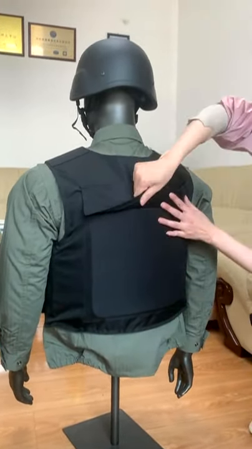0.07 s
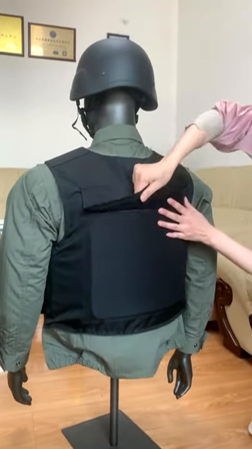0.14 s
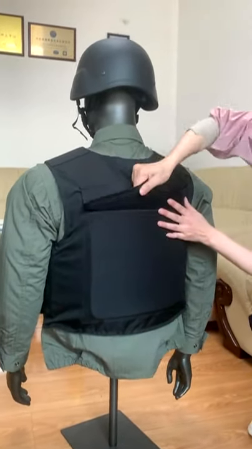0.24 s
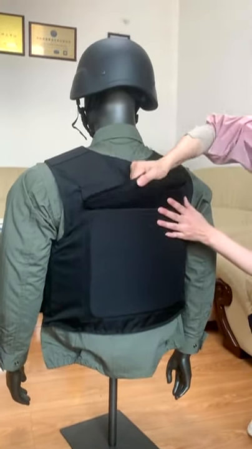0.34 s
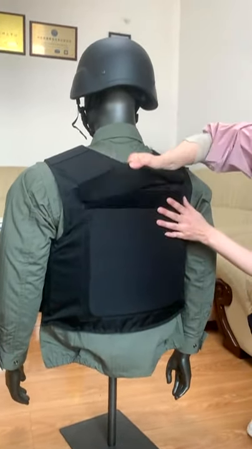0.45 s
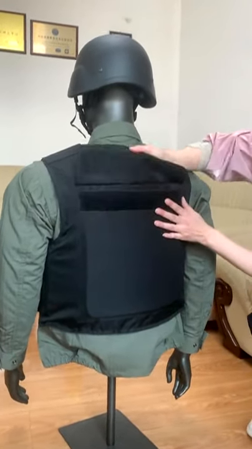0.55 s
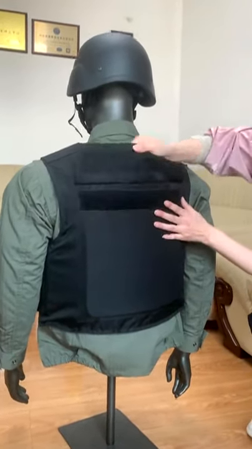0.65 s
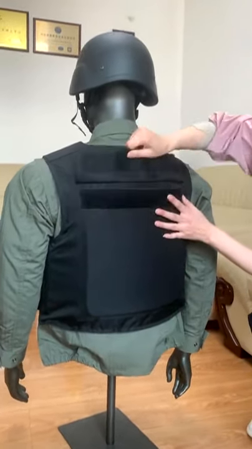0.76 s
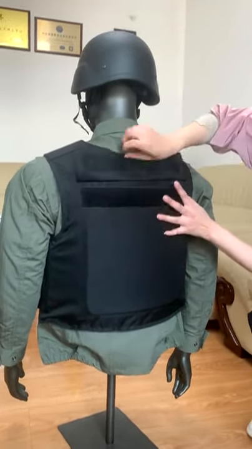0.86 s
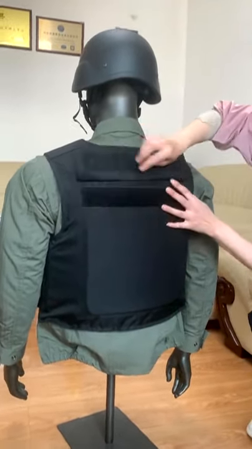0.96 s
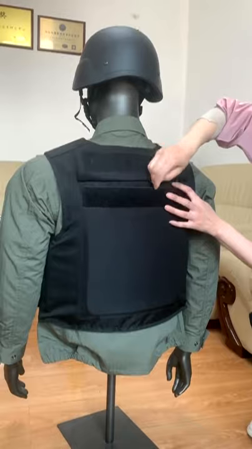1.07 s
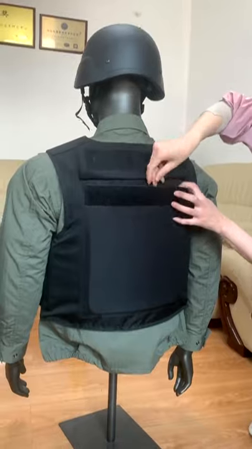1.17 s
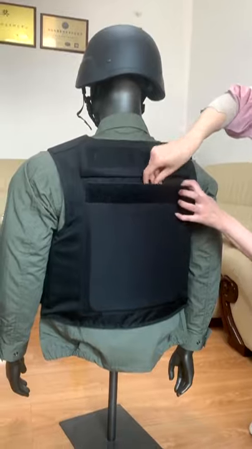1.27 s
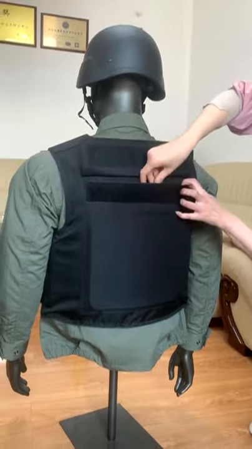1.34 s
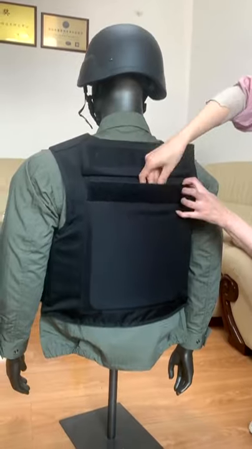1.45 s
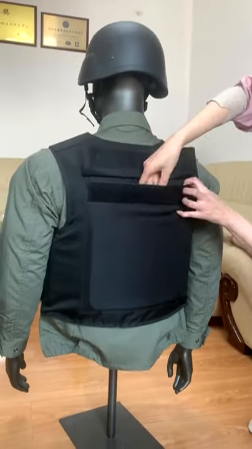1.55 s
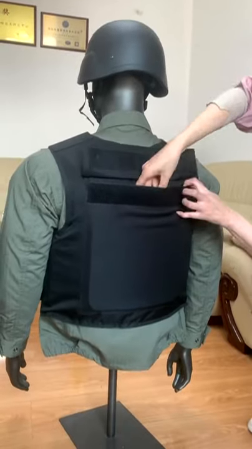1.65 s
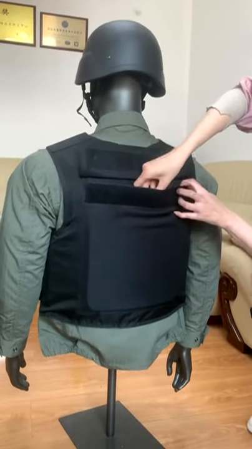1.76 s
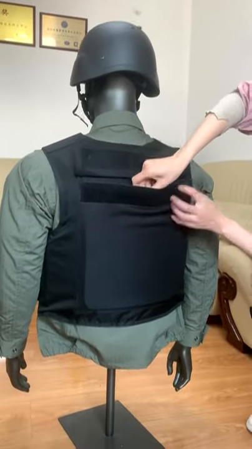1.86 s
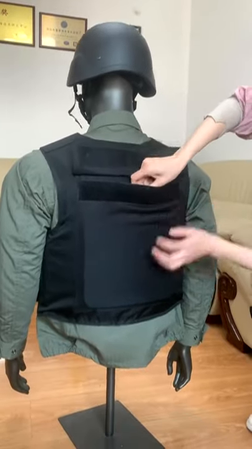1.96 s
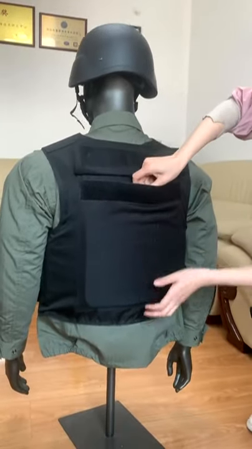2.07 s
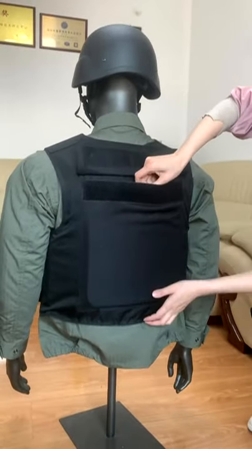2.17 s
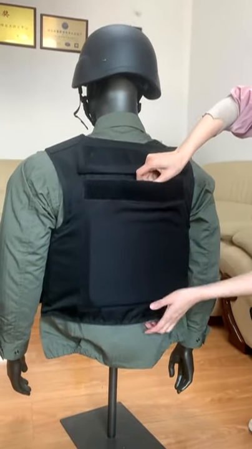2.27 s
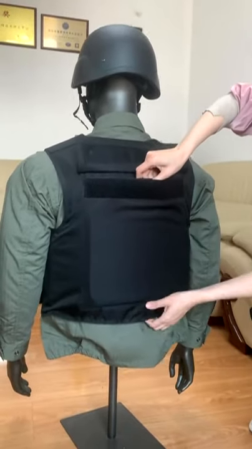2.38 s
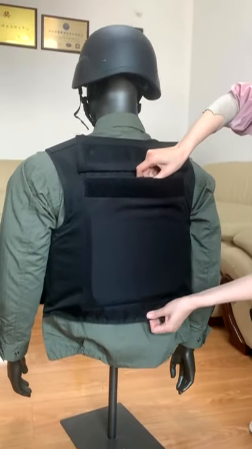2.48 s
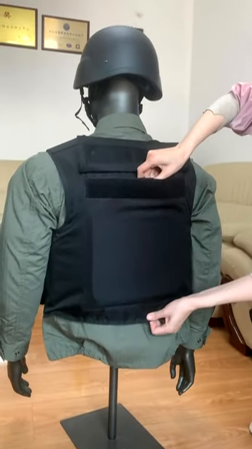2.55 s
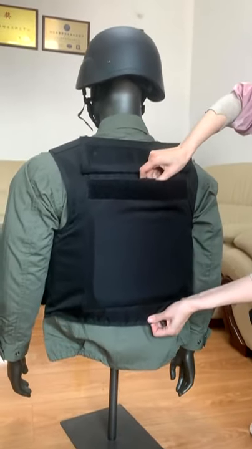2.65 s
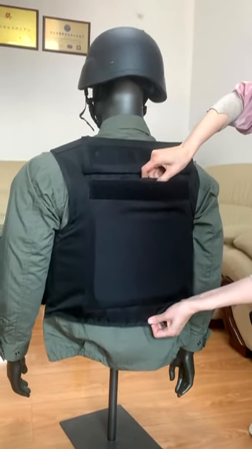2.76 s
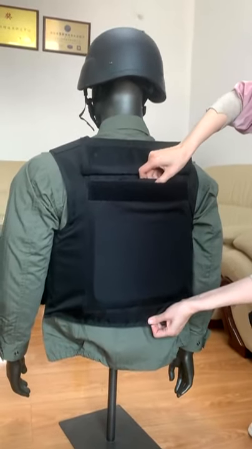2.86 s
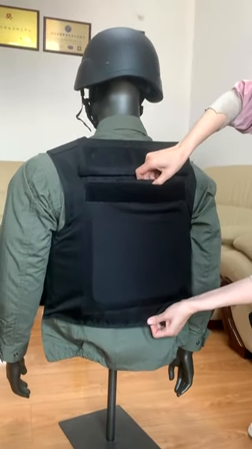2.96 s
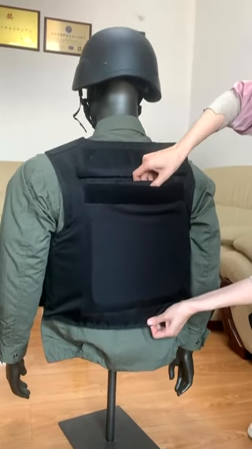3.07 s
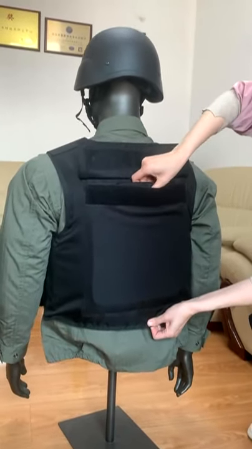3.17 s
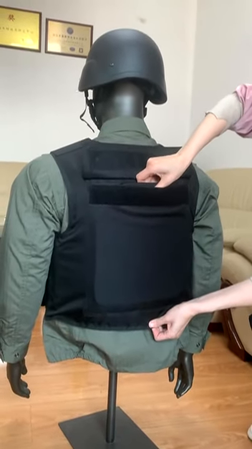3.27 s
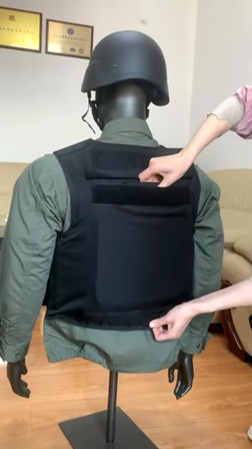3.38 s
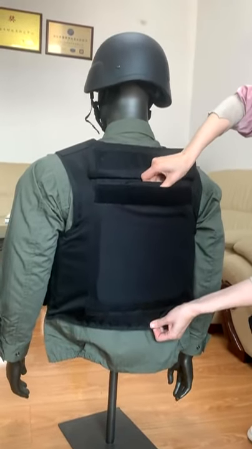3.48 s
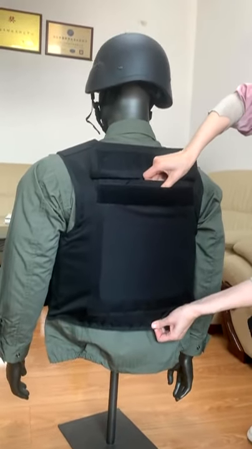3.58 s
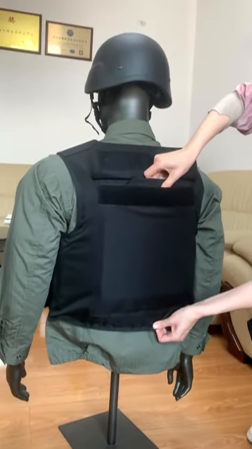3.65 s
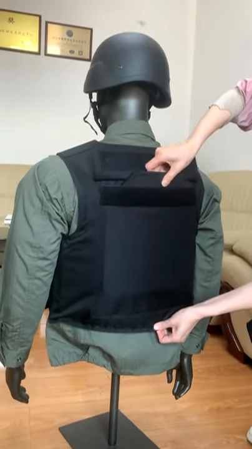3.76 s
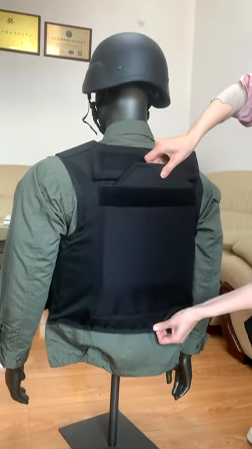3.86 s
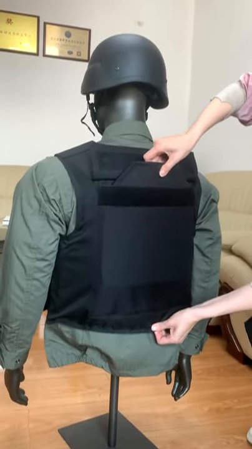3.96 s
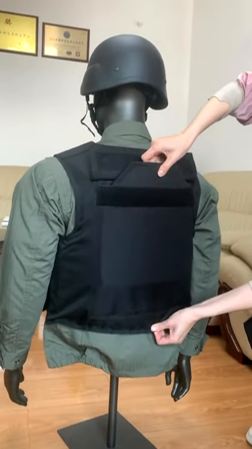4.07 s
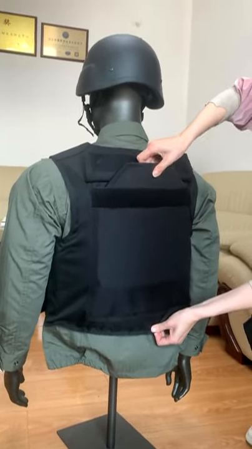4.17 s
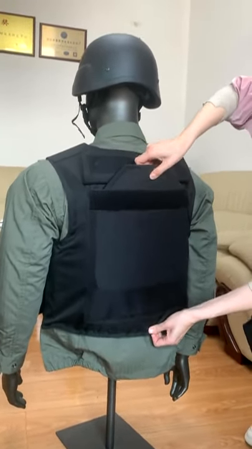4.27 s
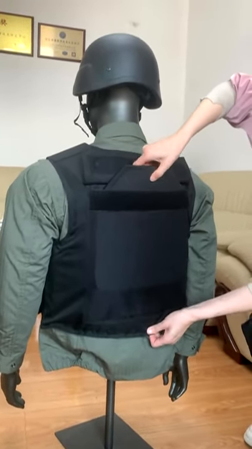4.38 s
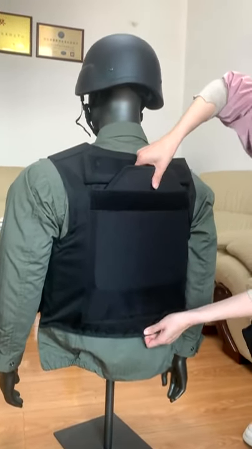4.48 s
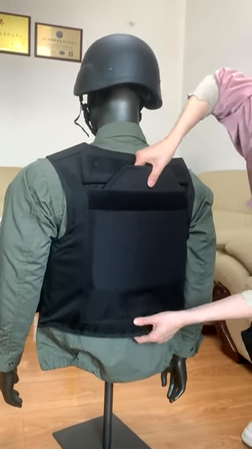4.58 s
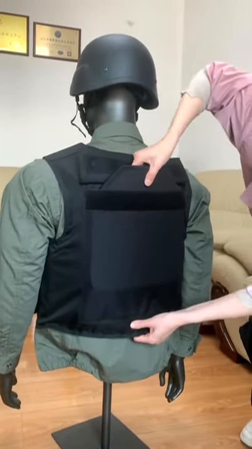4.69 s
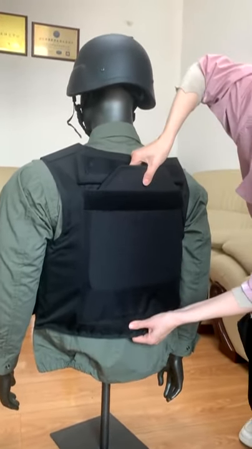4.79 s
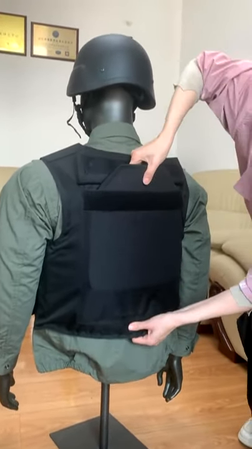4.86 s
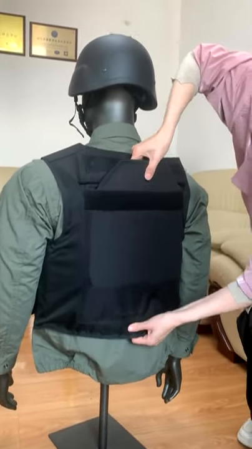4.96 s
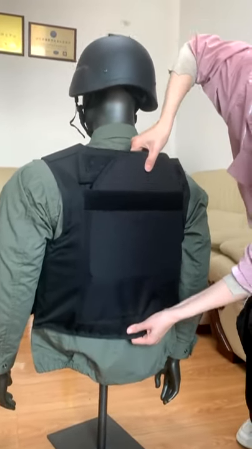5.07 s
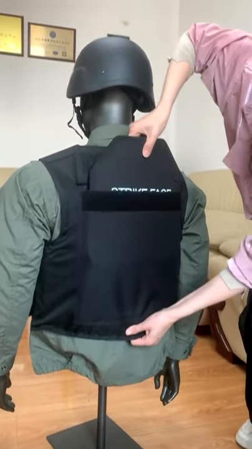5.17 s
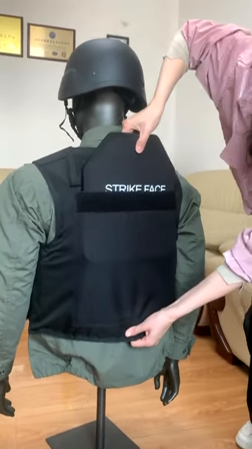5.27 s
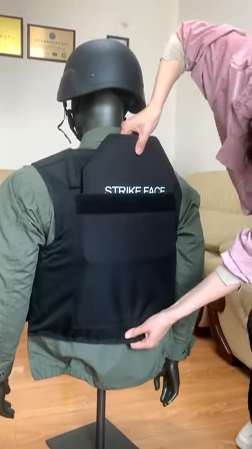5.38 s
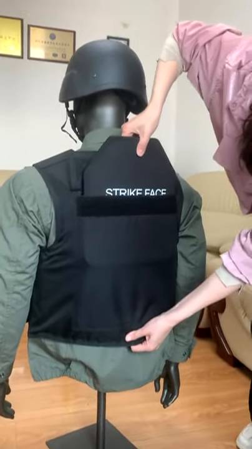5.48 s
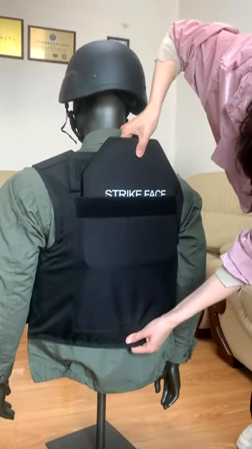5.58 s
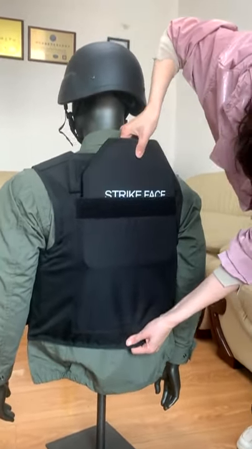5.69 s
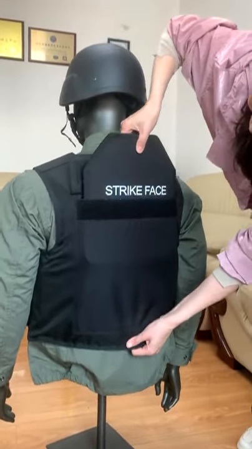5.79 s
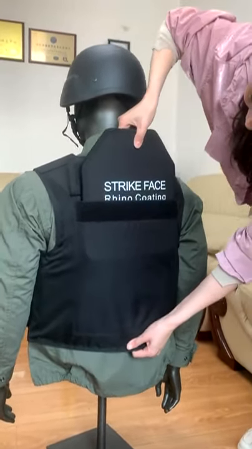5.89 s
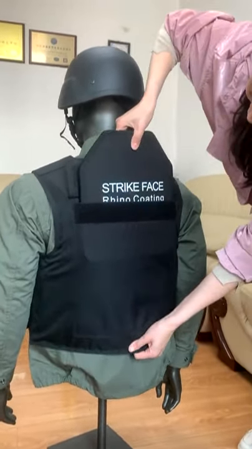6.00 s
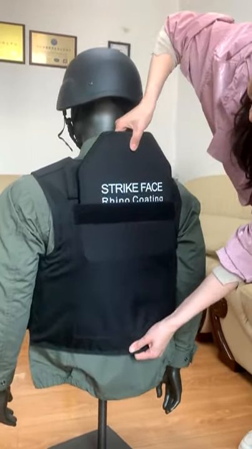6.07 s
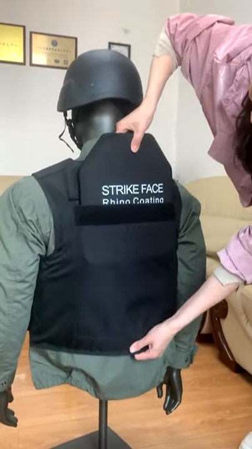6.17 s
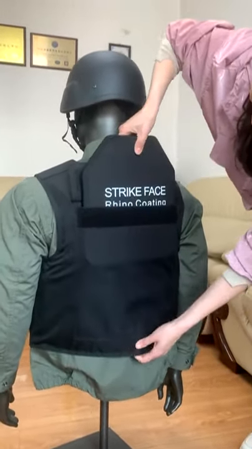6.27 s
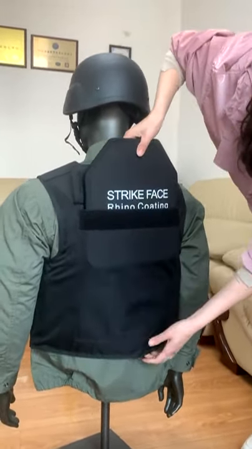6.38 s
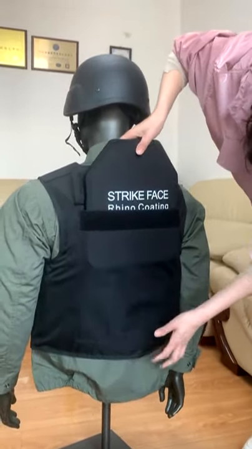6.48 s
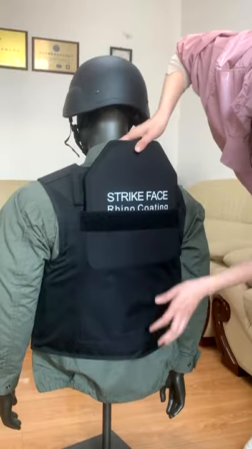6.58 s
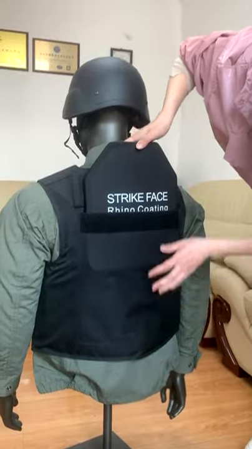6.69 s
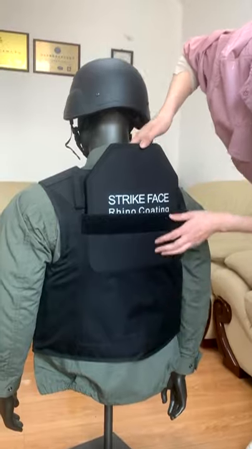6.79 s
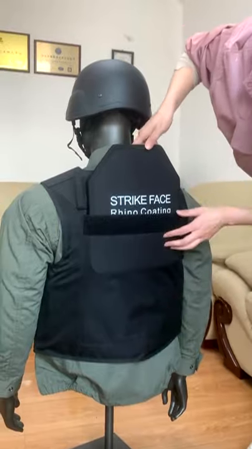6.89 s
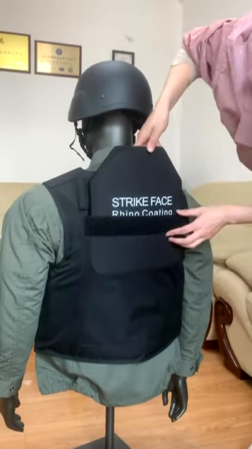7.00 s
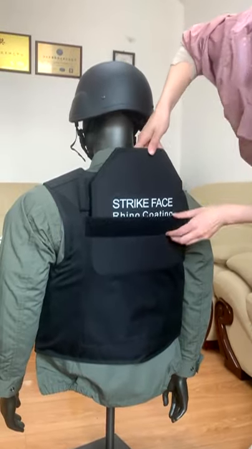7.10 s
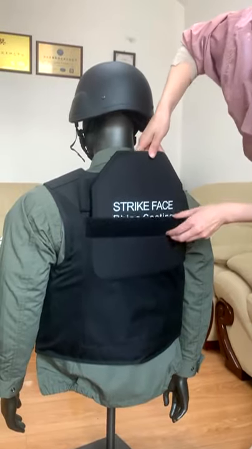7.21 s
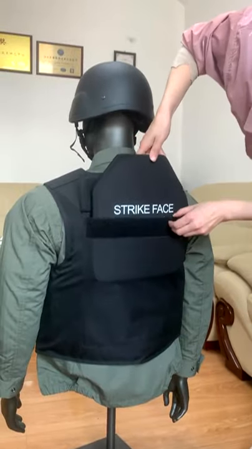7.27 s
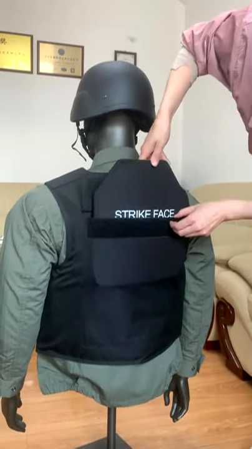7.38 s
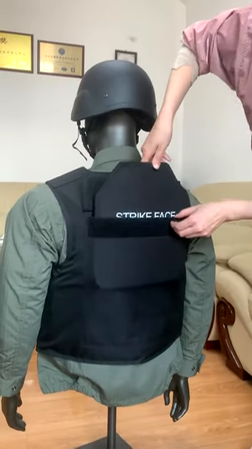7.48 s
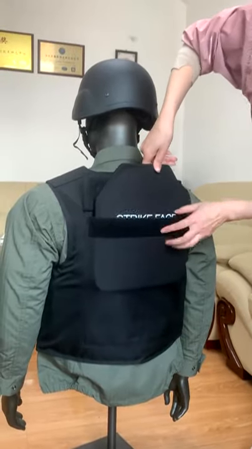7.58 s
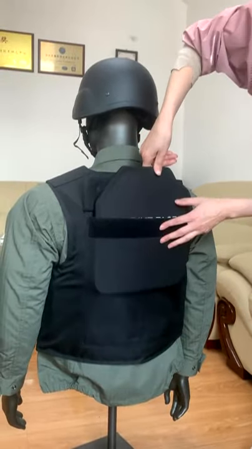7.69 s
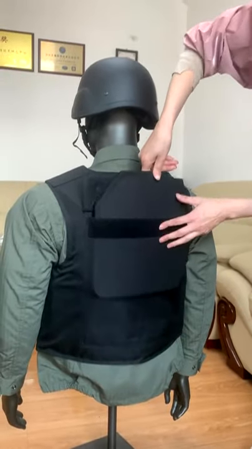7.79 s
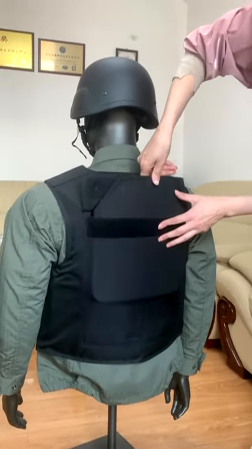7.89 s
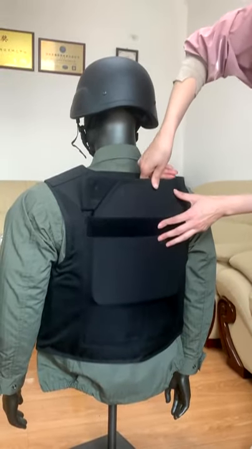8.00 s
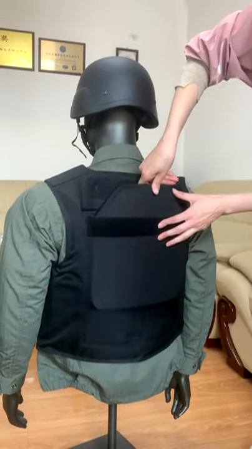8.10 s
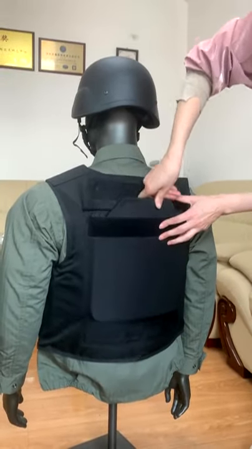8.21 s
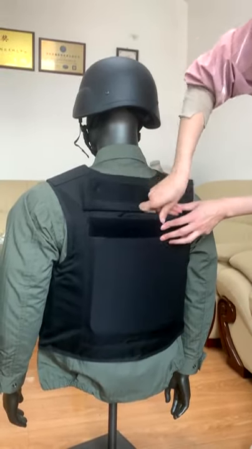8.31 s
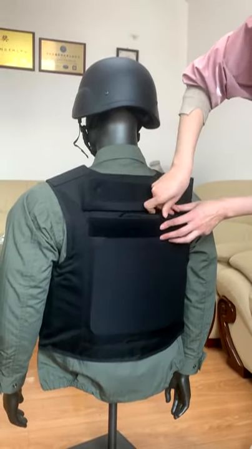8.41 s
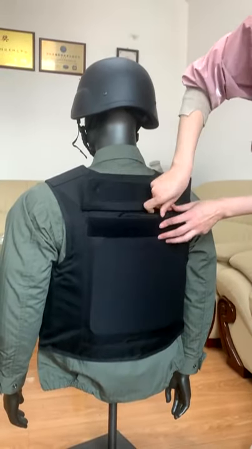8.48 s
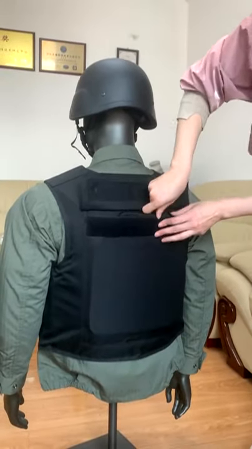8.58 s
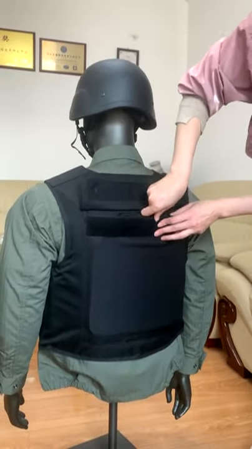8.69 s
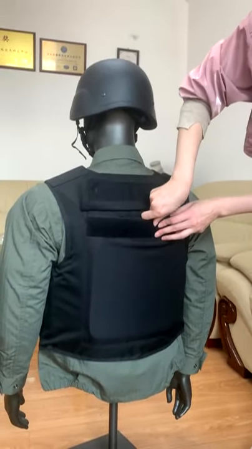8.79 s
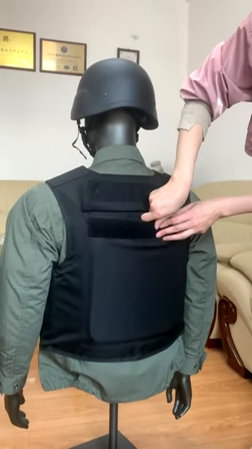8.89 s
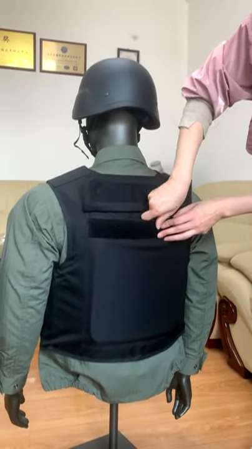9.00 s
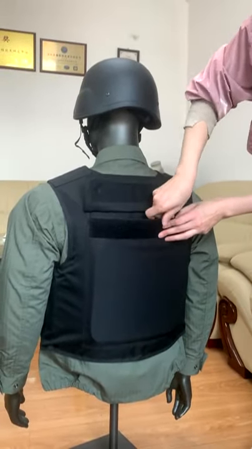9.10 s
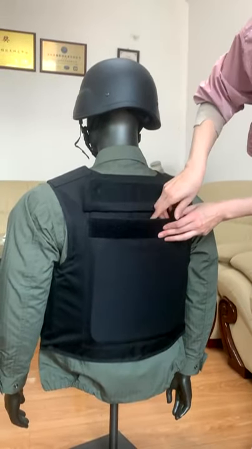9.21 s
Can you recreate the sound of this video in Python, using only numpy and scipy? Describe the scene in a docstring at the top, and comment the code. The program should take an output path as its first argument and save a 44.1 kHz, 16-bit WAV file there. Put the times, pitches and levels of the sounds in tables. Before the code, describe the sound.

A hook-and-loop flap rips open sharply, then a hard plate slides out of and back into a nylon vest pocket with rustles and soft knocks.

```python
"""In a furnished room, a hook-and-loop flap on a padded vest is torn open: hooks snap free as
clusters of filtered clicks. A hard plate is then slid up and down in its nylon pocket, heard as
filtered noise and clicks, while hands pat the cloth and knock the plate (decaying sines).
The room answers with decaying noise, rumbles and hums faintly; two microphone ports hear it all
with a phase offset and a likeness that depend on pitch."""
import sys
import numpy as np
from scipy import signal
from scipy.fft import rfft, irfft, next_fast_len
from scipy.io import wavfile

SR = 44100
rng = np.random.default_rng(int(sys.argv[2]) if len(sys.argv) > 2 else 0)


def wrap_up_sound(samples):
    """Save the sound to the file named by the first command line argument, as 16-bit audio."""
    columns = np.atleast_2d(samples).T
    # keep every value between -1 and 1, then stretch to whole-number steps
    tamed = np.clip(columns, -1, 1)
    steps = np.round(tamed * 32767).astype(np.int16)
    wavfile.write(sys.argv[1], SR, steps)


def field_ratio(decibels):
    """Amplitude ratio for a level in dB (20 dB per decade); scalars and array-likes work."""
    return 10 ** (np.asarray(decibels, dtype=float) / 20)


N = 407925
SIZE = next_fast_len(N + SR)   # transform length, with room for a one-second tail
HZ = np.maximum(np.arange(SIZE // 2 + 1) * SR / SIZE, 1)
TIME = np.arange(N) / SR

# The pull of the tear. Each row: time in seconds, relative level in dB.
TEAR_PULL = [(.29, -46), (.305, -37.5), (.35, -25.5), (.39, -22), (.403, -17.5), (.448, -22), (.47, -18),
             (.55, -24.5), (.5525, -16), (.59, -18), (.61, -22.5), (.665, -16.5), (.705, -20), (.73, -61.5)]
# The flap gives way in jerks. Each row: time in seconds, relative peak in dB.
JERKS = [(0.3071, -10.5), (0.324, -18), (0.3351, -12.5), (0.3984, -13), (0.404, -11), (0.4285, -14.5),
         (0.4702, -11.5), (0.509, -3.5), (0.554, -12), (0.5593, -1.5), (0.573, -11.5), (0.635, -12.5)]
# Bunches of hooks that part in one wide-band crack: rate, relative level.
BUNCHES_PER_S, BUNCH_DB = 1000, -1.5
# Stiff tape behind the hooks. Each row: mode in Hz, relative level in dB, t60 in seconds.
BACKING_MODES = [(3460, -25, 0.0039), (400, -55.5, 0.094)]
# Colour of the hook snaps. Each row: frequency in Hz, relative density in dB per Hz.
HOOK_COLOUR = [(300, -34), (800, -14), (1500, -8), (2400, -6.5), (3400, -0.5), (4300, -2), (6000, -4),
               (7500, -5.5), (10000, -6), (11200, -10), (12000, -27.5)]

# Strokes of hand, flap and plate along the nylon. Each row: peak time in seconds, hiss gain in dB,
# rise in seconds, fall in seconds (both spanning 20 dB), coarse-cloth gain in dB over the hiss gain.
STROKES = [(.196, -46, 0.012, 0.082, -18.5), (.73, -48, .015, 0.37, 1), (1.061, -38.5, 0.026, 0.015, -1),
           (1.49, -60.5, 0.055, 0.064, 1), (1.68, -62, 0.04, 0.099, 12), (2.02, -65.5, 0.2, 0.41, 7),
           (2.36, -53, 0.23, 0.25, 0), (2.66, -59, 0.79, 0.076, 7), (2.98, -53.5, 0.48, 0.082, -5.5),
           (3.341, -63, 0.47, 0.12, 7), (3.599, -59, 0.17, .5, -27), (4.008, -43.5, 0.38, 0.16, -2),
           (4.738, -59, 0.22, 0.18, 7.5), (5.081, -50, 0.088, 0.57, -18.5), (5.343, -39, 0.27, 0.15, 2),
           (5.97, -52, 0.03, 0.31, 4), (6.051, -43, 0.11, 0.095, 1), (6.45, -62, 0.17, 0.18, 8.5),
           (6.9, -67.5, 0.47, 0.3, 8.5), (7.04, -59.5, 0.044, 0.1, -20), (7.47, -46.5, 0.17, 0.13, -2),
           (7.7, -52, 0.7, 1, -28), (8.08, -49.5, 0.31, 0.33, 0), (8.443, -37, 0.23, 0.14, -3.5),
           (8.908, -48, .04, 0.18, -1.5), (9.068, -49, 0.213, 0.085, -5)]
RISE_ROUNDNESS, FALL_ROUNDNESS = 1.21, 1.56   # 1 pointed, 2 bell: gathers speed evenly, stops short
# Cloth creaking under resting hands. Each row: time in seconds, hiss gain in dB,
# coarse-cloth gain in dB.
RESTING_HANDS = [(0, -58.5, -49.5), (.29, -60, -53.5), (1.0, -70, -50), (1.45, -67.5, -59.5),
                 (3.2, -75.5, -66.5), (4.3, -68, -64), (4.69, -74, -55), (4.95, -71, -56),
                 (5.7, -106.5, -60.5), (6.7, -83.5, -80), (7.16, -88, -54), (7.4, -79, -50),
                 (8.7, -75.5, -60.5), (9.25, -66.5, -69)]
# Colour of the fine weave. Each row: frequency in Hz, relative density in dB per Hz.
HISS_COLOUR = [(1500, -3.5), (2500, -6.5), (6500, 2.5), (8500, 1.5), (10500, -1), (12000, -6)]
# Colour of the coarse folds. Each row: frequency in Hz, relative density in dB per Hz.
FOLD_COLOUR = [(250, -0.5), (450, 2), (900, 0.5), (1600, 0), (2600, -2.5), (4000, -9)]
# The plate edge scratches over threads: rate, mean gain against the coarse cloth.
SCRATCHES_PER_S, SCRATCH_DB = 360, -11
# Colour of the scratches. Each row: frequency in Hz, relative density in dB per Hz.
SCRATCH_COLOUR = [(400, -1), (1500, -4), (4000, -6), (9000, -13.5)]

# Quick brushes of flap and hand. Each row: peak time in seconds, peak gain in dB,
# rise in seconds, fall in seconds (both time constants).
BRUSHES = [(0.197, -36, 0.0011, 0.025), (1.067, -24.5, 0.0077, 0.0052), (3.321, -50, 0.00055, .003),
           (3.338, -42.5, .0009, .004), (4.4557, -35.5, 0.00042, 0.004), (5.94, -41.5, .0006, 0.035),
           (0.282, -37.5, 0.00066, 0.0026)]
CRACK_DB = 15.5   # height of the one click at the peak of a sudden brush, before colouring
# Colour of the brushes. Each row: frequency in Hz, relative density in dB per Hz.
BRUSH_COLOUR = [(700, -1.7), (2000, 0.68), (5000, -1.7), (11000, -2.5)]

# Pats and knocks. Each row: time in seconds, relative level in dB, settled pitch in Hz.
KNOCKS = [(0.02, -39, 764), (0.282, -33, 1330), (0.282, -34, 410), (1.2569, -37, 770), (1.2601, -36, 414),
          (1.269, -46.5, 474), (1.668, -52, 372), (2.373, -44.5, 720), (2.448, -47.5, 480),
          (3.146, -45, 370), (3.158, -54, 300), (3.1623, -49.5, 383), (4.4583, -42.5, 1020),
          (4.4595, -41, 400), (4.678, -28, 590), (4.6839, -33, 234), (7.144, -46.5, 680), (7.427, -42, 590),
          (8.596, -42.5, 790), (8.763, -48, 1225), (8.898, -42, 720), (8.9705, -33, 1706),
          (9.014, -43, 670), (9.0646, -32.5, 2090)]
BOUNCE_S, BOUNCE_DB = 0.0105, -9.5   # every blow rebounds softly, twice
# Modes of the padding. Each row: frequency in Hz, relative level in dB, t60 in seconds.
PADDING_MODES = [(150, -7, 0.025), (248.7, -9, 0.023), (367, -6, 0.016)]
# Colour of the contact scuff. Each row: frequency in Hz, relative density in dB per Hz.
SCUFF_COLOUR = [(800, 0.5), (2000, 6.0), (3000, -8.0), (9000, -15.0)]

# Soft pats of the hand. Each row: time in seconds, pitch in Hz, level in dB.
PATS = [(0.703, 928.4, -24), (0.929, 1146, -38), (.931, 620, -48), (.941, 160, -45), (1.072, 449.3, -41),
        (2.235, 560, -53.5), (2.64, 800, -52), (2.695, 520, -55)]
PAT_HALF_S = 0.01
# Brief drones of vest, stand and dragged plate. Each row: time in seconds, pitch in Hz,
# level in dB, half length in seconds.
DRONES = [(0.73, 95.2, -42.5, .04), (0.948, 125.3, -56.5, 0.38), (4.029, 150, -48, 0.036),
          (4.73, 261, -54, 0.025), (4.985, 62.4, -48.5, 0.053), (5.266, 112.6, -46, 0.04),
          (5.382, 343.8, -48.5, 0.086), (6.076, 160.8, -46, 0.063), (8.325, 92.4, -49, 0.067),
          (8.401, 158, -49, 0.031), (8.477, 469.3, -44.5, 0.042), (8.481, 239.4, -44.5, 0.098)]

# Decay of the room. Each row: frequency in Hz, t60 in seconds.
ROOM_DECAY = [(200, 1), (1000, 0.65), (3000, 0.6), (8000, 0.28)]
REVERB_DB, POCKET_REVERB_DB = -7, -8   # the flap rings out into the room more than the pocket
# Colour of the room rumble. Each row: frequency in Hz, relative density in dB per Hz.
ROOM_COLOUR = [(15, -34.5), (25, -4.5), (54, 8.5), (80, 9), (146, 0), (371, -5.5), (421, -12.5),
               (867, -16.5), (2070, -18), (4200, -34.5), (8800, -66.5)]
ROOM_TONE_DB, HUM_HZ = -57.5, 372
# The room's hum. Each row: time in seconds, level in dB.
HUM_LEVEL = [(1.1, -78), (1.3, -61.5), (1.8, -72), (3.3, -71.5), (6.3, -73), (6.6, -63.5), (7.1, -65),
             (7.4, -102)]

# Right port against left, in the bass. Each row: frequency in Hz, lag in half cycles, likeness 0-1.
PORTS_BASS = [(0, 0.0013, 1.0), (300, 0.0058, 0.85)]
# The middle range for the flap. Each row: frequency in Hz, lag in half cycles, likeness 0-1.
PORTS_FLAP = [(2036, 0.11, 1), (2340, 0.073, 0.7), (2874, 0.92, 1), (4100, 0.17, 0.28), (4400, 0.67, 0.6),
              (5230, 1, 0.63)]
# The middle range for the pocket. Each row: frequency in Hz, lag in half cycles, likeness 0-1.
PORTS_POCKET = [(2126, 0.062, 0.67), (2600, 0, 0.027), (3470, 0.12, 0.06), (4050, 1, 0.16), (4680, 1, 1)]
# The treble of both. Each row: frequency in Hz, lag in half cycles, likeness 0-1.
PORTS_TREBLE = [(5200, 1, 1), (5800, 1, 1), (6200, 1.2, .55), (6800, 1.8, .7), (7200, 2, 1), (9500, 2, 1),
                (10300, 2.4, .45), (10800, 2.7, .6), (11100, 3, 1)]
OPPOSED_HZ, IN_STEP_HZ = 5450, 8000
# The gap near 5 kHz in the sum of both channels. Each row: time in seconds, # mean width from -1 narrow to 1
# wide.
GAP_WIDTH = [(1.9, 0.21), (2.3, 1), (4.1, 0.33), (4.6, 0.11)]


def rms_one(x):
    """Normalisation: the signal scaled to a root mean square of 1."""
    return x / np.sqrt(np.mean(x ** 2) + 1e-20)


def in_time(rows):
    """Linear interpolation: the columns of a curve, sample by sample."""
    s, *columns = np.transpose(rows)
    return [np.interp(TIME, s, column) for column in columns]


def at_hz(points):
    """Interpolation over log frequency: a table read at every bin."""
    hz, values = np.array(points)[:, 0], np.array(points)[:, 1]
    return np.interp(np.log(HZ), np.log(hz), values)


def shaped(x, response):
    """Linear filtering: multiplication of the spectrum by a frequency response."""
    return irfft(rfft(x, SIZE) * response, SIZE)[..., :N]


def around(hz, width):
    """Band-pass response: a bell over log frequency."""
    return np.exp(-(np.log(HZ / hz) / width) ** 2)


def coloured(x, spectrum):
    """Spectral colouring: the tabled slope, falling away below its first point; rms 1."""
    bass_fall = np.minimum(HZ / spectrum[0][0], 1) ** 2
    return rms_one(shaped(x, field_ratio(at_hz(spectrum)) * bass_fall))


def drift(rate):
    """Low-passed noise: slow chance of spread 1, with its corner at rate in Hz."""
    return rms_one(shaped(rng.standard_normal(N), 1 / (1 + (HZ / rate) ** 2)))


def grains(per_s, spread_db):
    """Shot noise: random clicks of uneven size."""
    sizes = field_ratio(spread_db * np.minimum(rng.exponential(1, N), 3)) * rng.standard_normal(N)
    happens = rng.random(N) < per_s / SR
    return sizes * happens * np.sqrt(SR / per_s) / field_ratio(spread_db)


def ring(clicks, hz, t60):
    """Damped resonance: a unit click sets a sine of height about 1 ringing."""
    r, w = field_ratio(-60 / (t60 * SR)), 2 * np.pi * hz / SR
    return signal.lfilter([0, np.sin(w)], [1, -2 * r * np.cos(w), r * r], clicks + 1e-18)


def die_away(clicks, seconds):
    """Exponential decay: each click leaves a tail with this time constant."""
    return signal.lfilter([1], [1, -np.exp(-1 / (seconds * SR))], clicks + 1e-18)


def tear():
    """Stick-slip release: hooks snap in clumps across pitch; a jerk frees a burst behind one big snap."""
    level_db, = in_time(TEAR_PULL)
    per_s = 4500 * field_ratio(np.clip(level_db + 16.5, -20, 0))   # a harder pull frees hooks faster
    jerks = np.zeros(N)
    jerks[[round(s * SR) for s, db in JERKS]] = field_ratio(np.array(JERKS)[:, 1])
    torn = (TIME > TEAR_PULL[0][0]) * (TIME < TEAR_PULL[-1][0])
    pull = field_ratio(level_db + 1.9 * drift(70)) * torn + field_ratio(-20.0) * die_away(jerks, 0.0037)

    snapping = field_ratio(1.5) * jerks + field_ratio(BUNCH_DB) * grains(BUNCHES_PER_S, spread_db=2.5) * pull
    for hz in np.geomspace(225, 12500, num=11):
        snaps = grains(per_s, spread_db=-2.5) * field_ratio(1.3 * drift(120)) * pull
        snapping = snapping + shaped(snaps, around(hz, 0.48))
    backing = sum(field_ratio(db) * ring(snapping, hz, t60) for hz, db, t60 in BACKING_MODES)
    return backing + shaped(snapping, field_ratio(at_hz(HOOK_COLOUR) + 5.5))


def stroke_gains():
    """Incoherent addition: strokes swell, peak and die away, adding in power to resting hands."""
    hiss, coarse = field_ratio(np.array(in_time(RESTING_HANDS))) ** 2
    for s, db, rise, fall, coarse_db in STROKES:
        away = np.abs(TIME - s) / np.where(TIME < s, rise, fall)
        drop = np.where(TIME < s, away ** RISE_ROUNDNESS, away ** FALL_ROUNDNESS)
        power = field_ratio(db - 20 * drop) ** 2
        hiss, coarse = hiss + power, coarse + power * field_ratio(coarse_db) ** 2
    return np.sqrt(hiss), np.sqrt(coarse)


def rubbing():
    """Friction noise: fine weave hisses and coarse folds scuff, each size of fold at its own pace."""
    hiss_gain, coarse_gain = stroke_gains()
    catch_db = 0.77 * drift(14) + 0.96 * drift(11)   # the cloth catches and slips
    hiss = coloured(rng.standard_normal(N), HISS_COLOUR) * field_ratio(6.5 + catch_db)
    folds = 0
    for hz in np.geomspace(300, 4000, num=7):
        scuffs = grains(2.5 * hz, spread_db=-0.5) * field_ratio(3.0 * drift(12))
        folds = folds + shaped(scuffs, around(hz, 0.55))
    folds = coloured(folds, FOLD_COLOUR) * field_ratio(catch_db)
    scratches = coloured(grains(SCRATCHES_PER_S, spread_db=2.5), SCRATCH_COLOUR)
    scratches = scratches * field_ratio(SCRATCH_DB + 2.0 * drift(40))
    return hiss_gain * hiss + coarse_gain * (folds + scratches)


def brushes():
    """Enveloped shot noise: short wide-band swishes that swell and stop."""
    envelope, grain = 0, grains(9000, spread_db=1.5)
    sudden = [round(s * SR) for s, db, rise, fall in BRUSHES if rise < 0.002]
    grain[sudden] = field_ratio(CRACK_DB)
    for s, db, rise, fall in BRUSHES:
        envelope = envelope + field_ratio(db) * np.exp(-np.abs(TIME - s) / np.where(TIME < s, rise, fall))
    return envelope * coloured(grain, BRUSH_COLOUR)


def knocks():
    """Impact: a blow scuffs and rings, sagging in pitch as the cloth gives; padding thuds, most if dull."""
    out, contact = np.zeros(N), np.zeros(N)
    thuds = np.zeros((len(PADDING_MODES), N))
    strength_db = rng.normal(0, 0.82, (len(KNOCKS), len(PADDING_MODES)))
    for (s, db, hz), own_db in zip(KNOCKS, strength_db):
        at, cycles = round(s * SR), TIME[:SR // 10] * hz
        phase = 2 * np.pi * (cycles + 0.17 * (1 - np.exp(-cycles / 0.25)))
        # a second, shorter partial colours the start
        swing = np.sin(phase) + 0.18 * np.sin(0.82 * phase) * np.exp(-cycles / 1.7)
        decay = field_ratio(db + 7.5 - 60 * (cycles / 12.4) ** 1.14)
        tap = swing * decay * (1 - np.exp(-cycles / 0.96))
        out[at:at + len(tap)] += tap[:N - at]
        thuds[:, at + round(0.003 * SR)] = field_ratio(db + own_db) * min(600 / hz, 1)
        contact[at] = field_ratio(db - 9.5)
    out += die_away(contact, 0.0026) * coloured(rng.standard_normal(N), SCUFF_COLOUR)
    for clicks, (hz, db, t60) in zip(thuds, PADDING_MODES):
        out += field_ratio(db) * ring(clicks, hz, t60)
    rebounds = 0
    for k in (1, 2):
        later = np.interp(TIME - k ** 0.98 * BOUNCE_S, TIME, out)
        rebounds = rebounds + field_ratio(k * BOUNCE_DB) * later
    return out + rebounds


def drones():
    """Modulated carriers: narrow noise bands that swell and fade, wider the higher they lie."""
    out, wobble = 0, drift(33) + 1j * drift(29.64)
    for s, hz, db, half_s in DRONES + [(*pat, PAT_HALF_S) for pat in PATS]:
        # the wobble is read faster for a higher pitch
        place = (np.arange(N) * (hz / 130) ** 1.3).astype(int) % N
        rough = 1 + 0.8 * wobble[place]
        swell = np.exp(-((TIME - s) / half_s) ** 2 + 2j * np.pi * hz * TIME)
        out = out + rough * field_ratio(db) * swell
    return np.real(out)


def reverb(x):
    """Diffuse decay: convolution with noise that dies away band by band, another one for each side."""
    t, edges, tail = TIME[:SR], 60 * 2. ** np.arange(9), 0
    hz, seconds = np.transpose(ROOM_DECAY)
    for low, high in zip(edges, edges[1:]):
        t60 = np.interp(np.log(low * high) / 2, np.log(hz), seconds)
        octave = signal.butter(2, [low, high], "band", fs=SR, output="sos")
        band = signal.sosfilt(octave, rng.standard_normal((2, SR)))
        onset = 1 - np.exp(-t / 0.002)
        tail = tail + band * field_ratio(-60 * t / t60) * onset / np.sqrt(t60)
    return shaped(x, rfft(rms_one(tail) / np.sqrt(SR), SIZE))


def room_tone():
    """Partial coherence: low rumble, alike on both sides only in the bass, and a hum that comes and goes."""
    mid, side = rng.standard_normal((2, N))
    side = shaped(side, 0.49 * HZ / (HZ + 500))
    rumble = coloured(np.array([mid + side, mid - side]), ROOM_COLOUR)
    hum = np.sin(2 * np.pi * HUM_HZ * TIME + 0.5 * drift(3.6)) * field_ratio(in_time(HUM_LEVEL)[0])
    waver_db = 0.8 * drift(3)
    return field_ratio(ROOM_TONE_DB + waver_db) * rumble + hum


def ports(sound, middle_rows, width):
    """Interchannel coherence: above the low middle, ports differ by phase lag and a restless unlike part."""
    hz, half_cycles, likeness = np.transpose(PORTS_BASS + middle_rows + PORTS_TREBLE)
    mid, side = (sound[0] + sound[1]) / 2, (sound[0] - sound[1]) / 2
    # same envelope, wandering phase
    unlike = np.real(signal.hilbert(mid, SIZE)[:N] * np.exp(3j * drift(58)))
    mid, unlike = rfft(mid, SIZE), rfft(unlike, SIZE)
    side = rfft(side, SIZE) * 0.3 * HZ / (HZ + 300) / (1 + (HZ / 900) ** 4)

    out, width = 0, np.clip(width + 0.91 * drift(12.0), -1, 1)
    for step in (-1, 0, 1):   # narrow, middle and wide gap near 5 kHz, crossfaded
        below = np.minimum(HZ * (1 + 0.082 * step), OPPOSED_HZ)
        above = np.maximum(HZ * (1 - 0.047 * step * (HZ < IN_STEP_HZ)), OPPOSED_HZ)
        moved = np.where(HZ < OPPOSED_HZ, below, above)
        angle = np.arccos(np.clip(np.interp(moved, hz, likeness), 0, 1)) / 2
        common, apart = mid * np.cos(angle), unlike * np.sin(angle) + side
        lag = np.exp(-1j * np.pi * np.interp(moved, hz, half_cycles))
        both = irfft([common + apart, (common - apart) * lag], SIZE)[:, :N]
        out = out + both * np.clip(1 - np.abs(width - step), 0, 1)
    return out


def scene():
    """Superposition: the flap, a little higher, meets the ports at another angle than pocket and room."""
    flap, pocket = tear(), rubbing() + brushes() + knocks()
    echo = reverb(field_ratio(REVERB_DB) * flap + field_ratio(POCKET_REVERB_DB) * pocket)
    pocket = pocket + echo + drones() + room_tone()   # the room answers from the pocket's side
    flap_heard = ports(np.array([flap, flap]), PORTS_FLAP, 0)
    return flap_heard + ports(pocket, PORTS_POCKET, *in_time(GAP_WIDTH))


def roll_off(x):
    """The treble ends steeply here."""
    return signal.sosfilt(signal.butter(12, 12300, fs=SR, output="sos"), x)


def record(dry):
    """Linear gain: the input level is set for the finished mix."""
    mix = field_ratio(-2.5) * dry
    return roll_off(mix)


dry = scene()
out = record(dry)
wrap_up_sound(out)
```